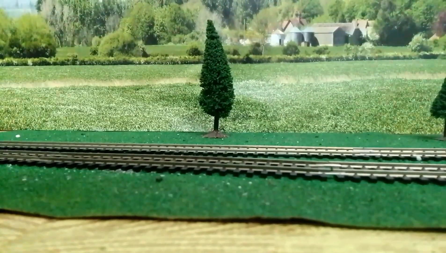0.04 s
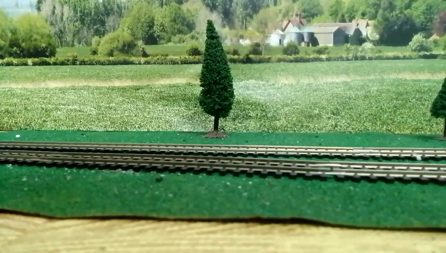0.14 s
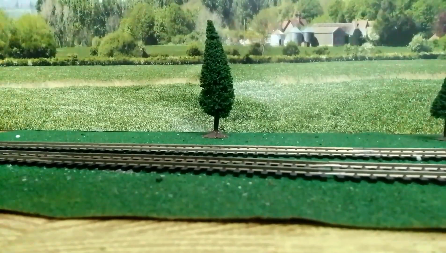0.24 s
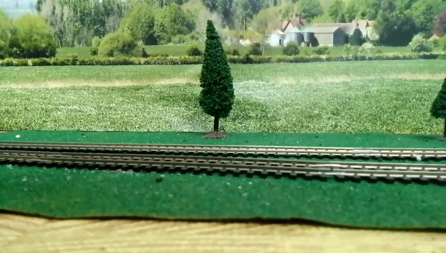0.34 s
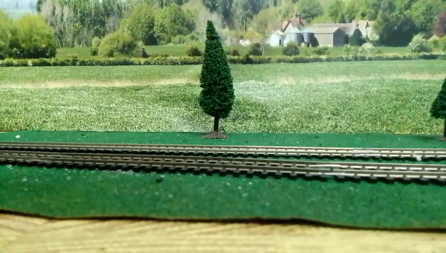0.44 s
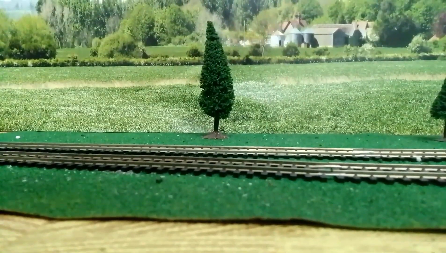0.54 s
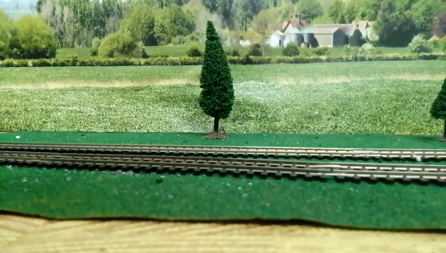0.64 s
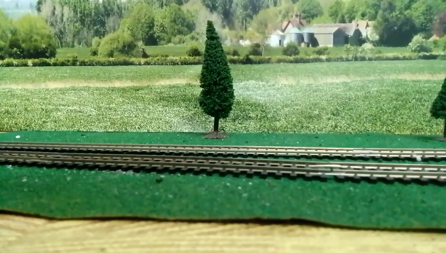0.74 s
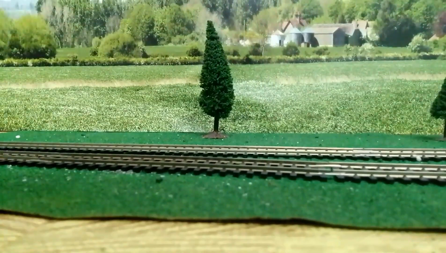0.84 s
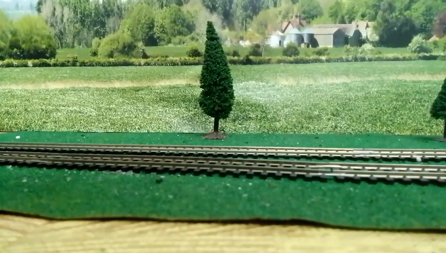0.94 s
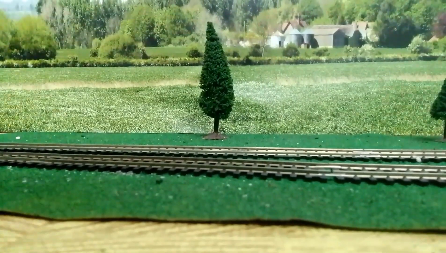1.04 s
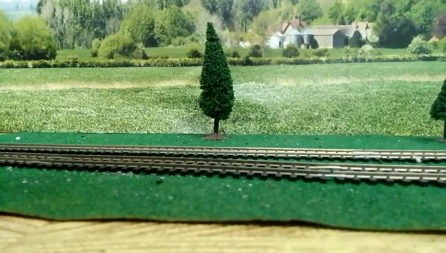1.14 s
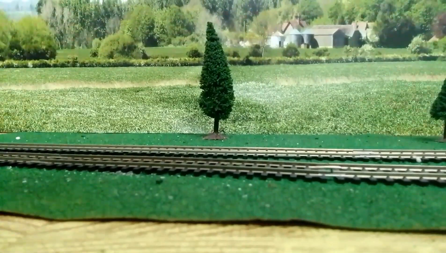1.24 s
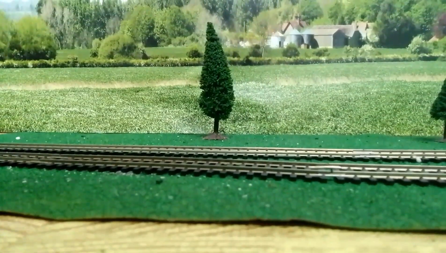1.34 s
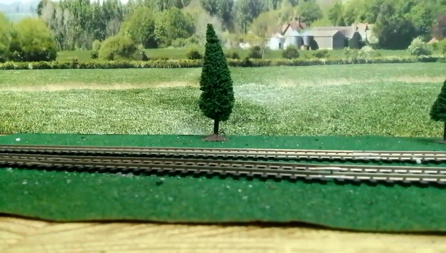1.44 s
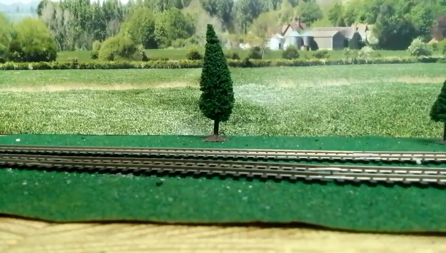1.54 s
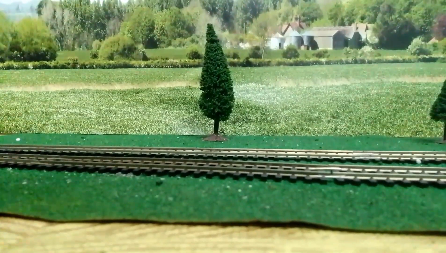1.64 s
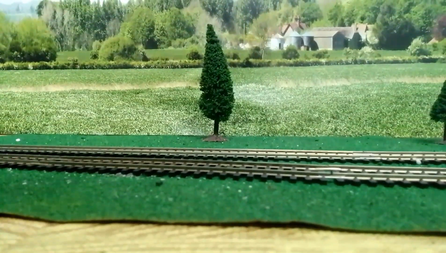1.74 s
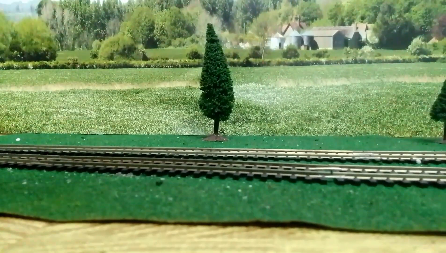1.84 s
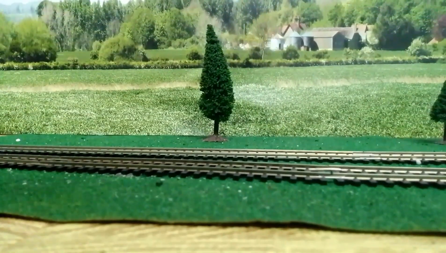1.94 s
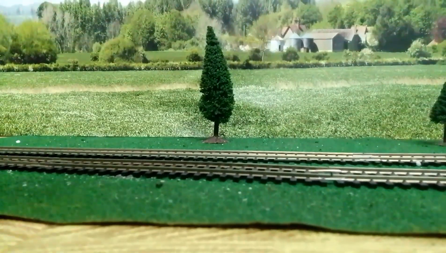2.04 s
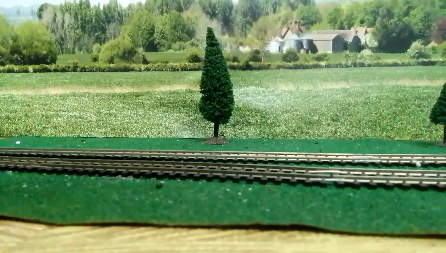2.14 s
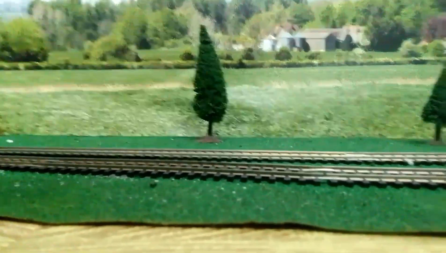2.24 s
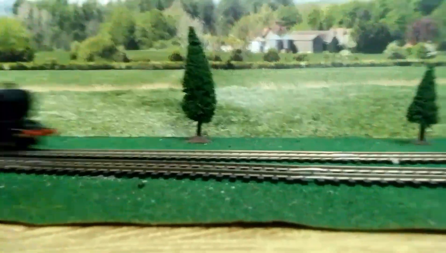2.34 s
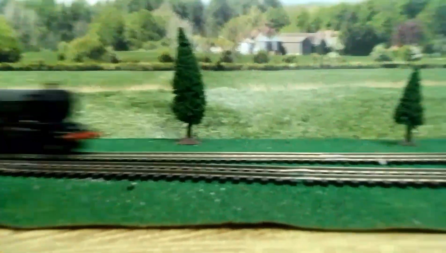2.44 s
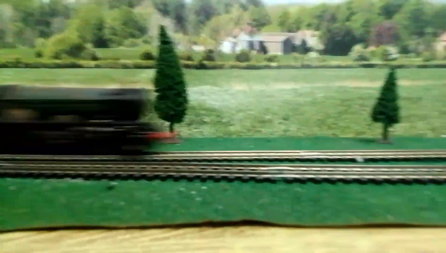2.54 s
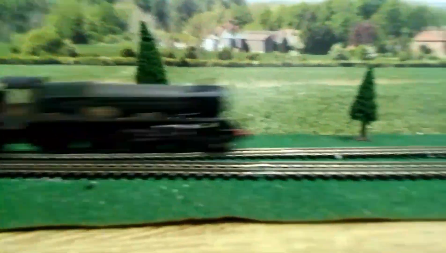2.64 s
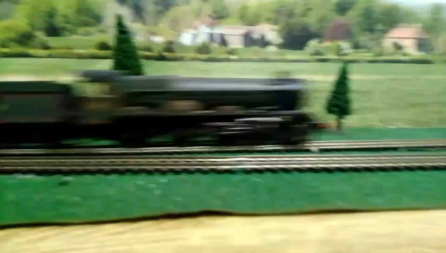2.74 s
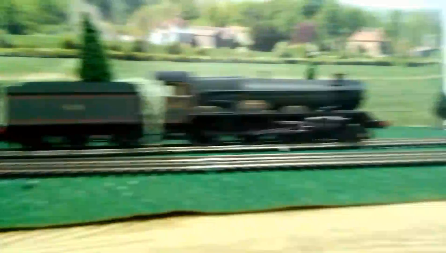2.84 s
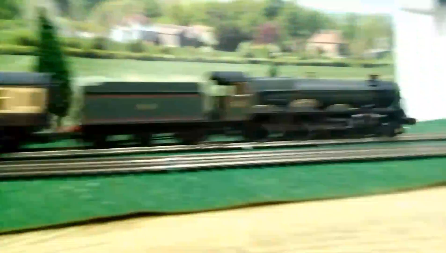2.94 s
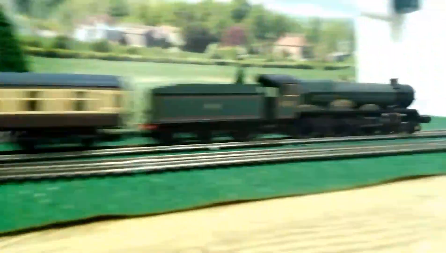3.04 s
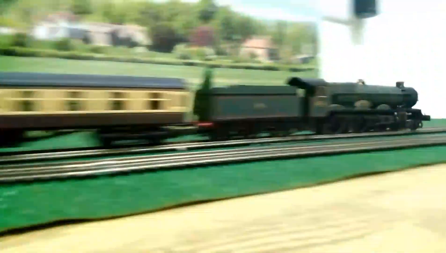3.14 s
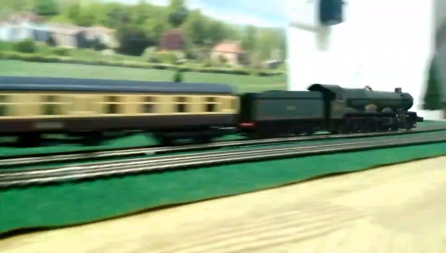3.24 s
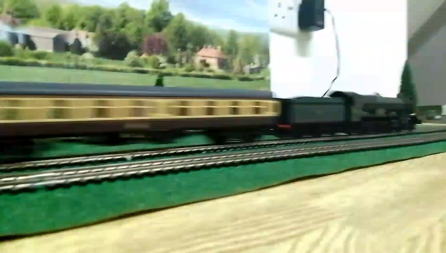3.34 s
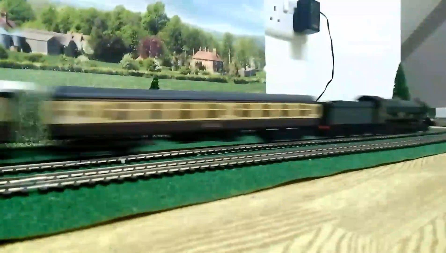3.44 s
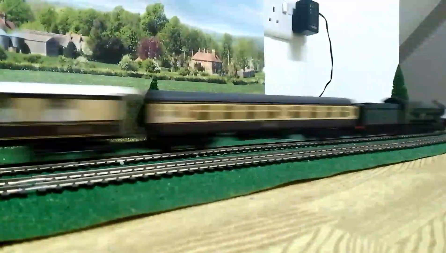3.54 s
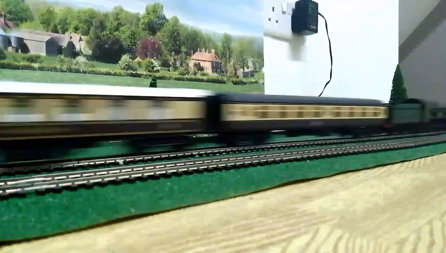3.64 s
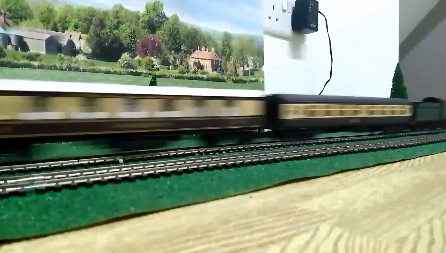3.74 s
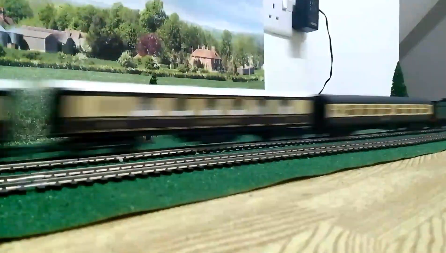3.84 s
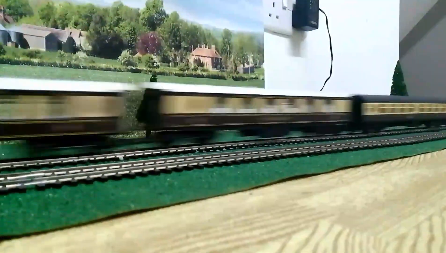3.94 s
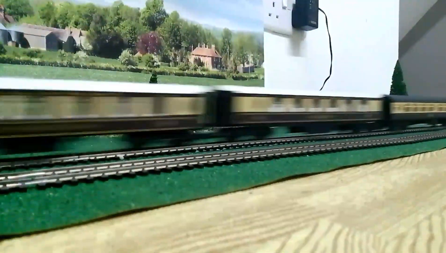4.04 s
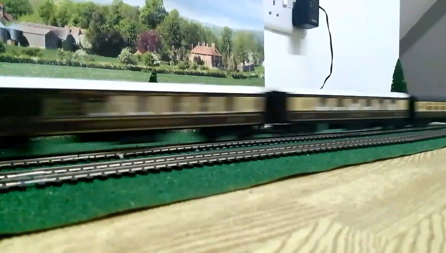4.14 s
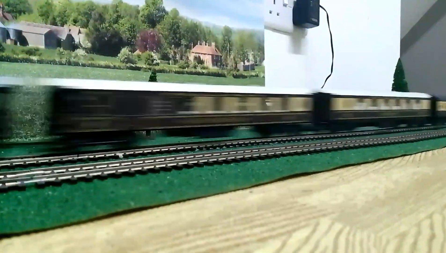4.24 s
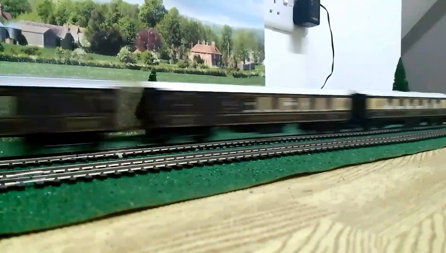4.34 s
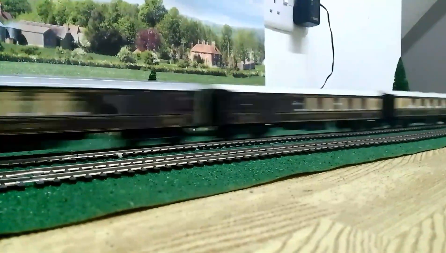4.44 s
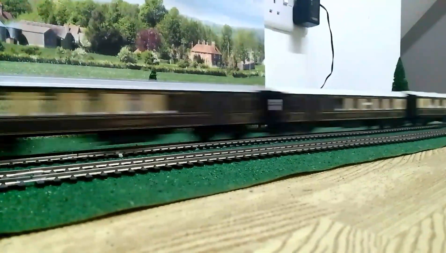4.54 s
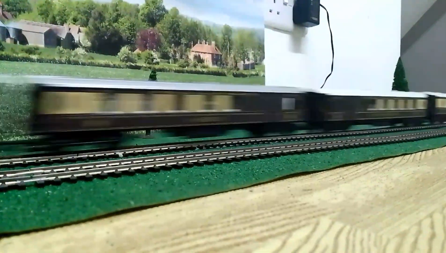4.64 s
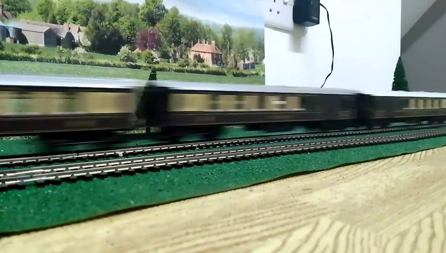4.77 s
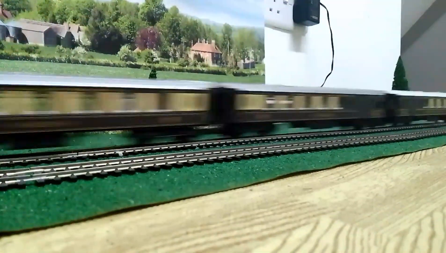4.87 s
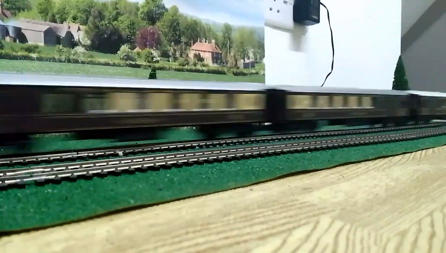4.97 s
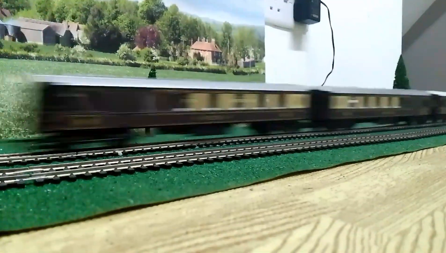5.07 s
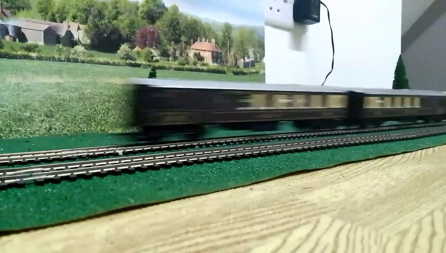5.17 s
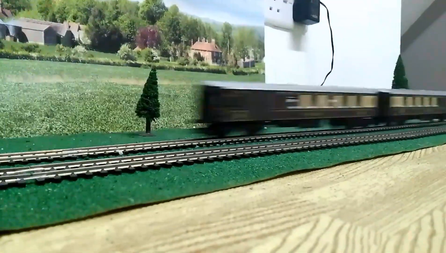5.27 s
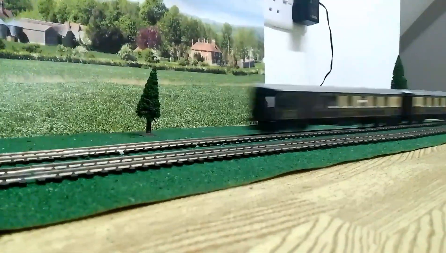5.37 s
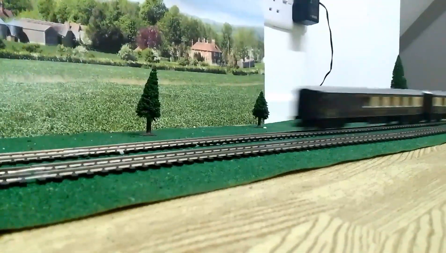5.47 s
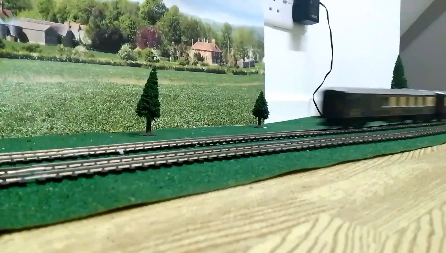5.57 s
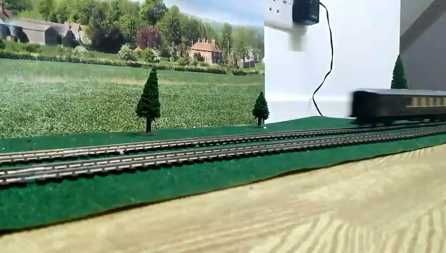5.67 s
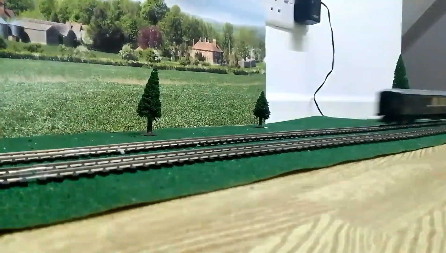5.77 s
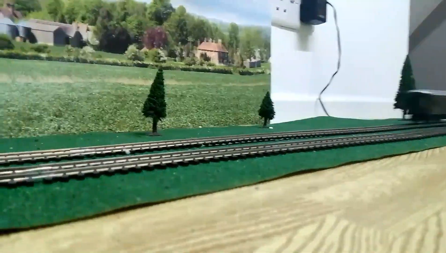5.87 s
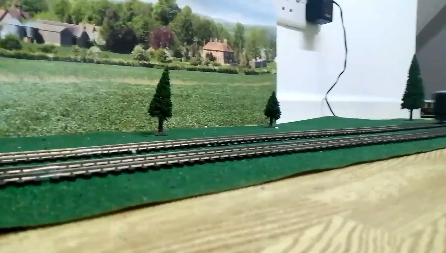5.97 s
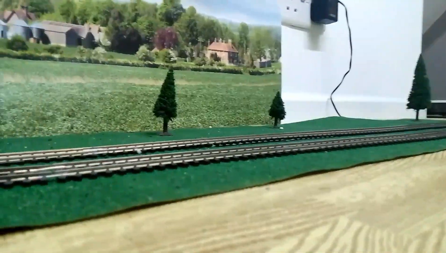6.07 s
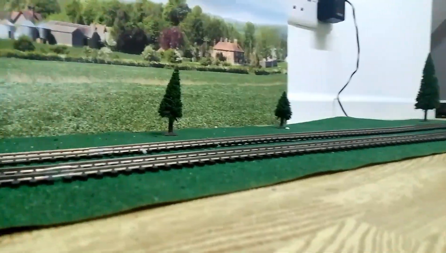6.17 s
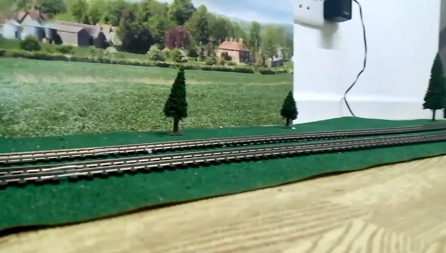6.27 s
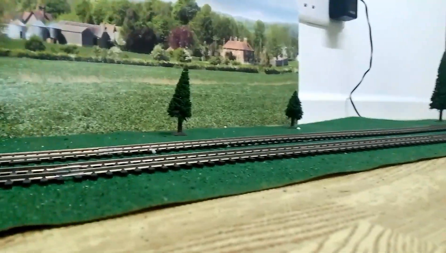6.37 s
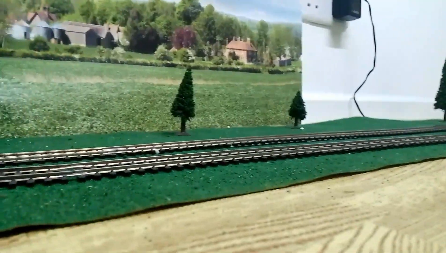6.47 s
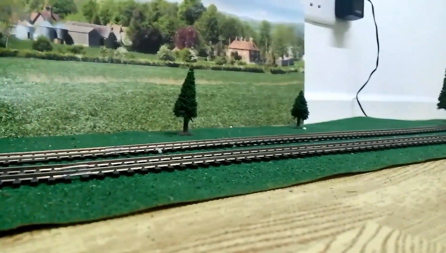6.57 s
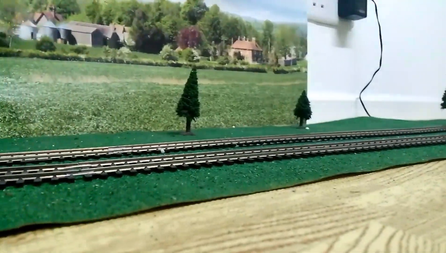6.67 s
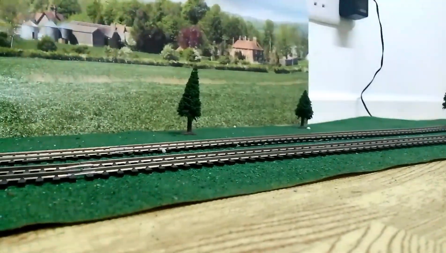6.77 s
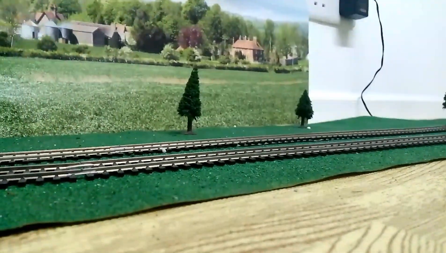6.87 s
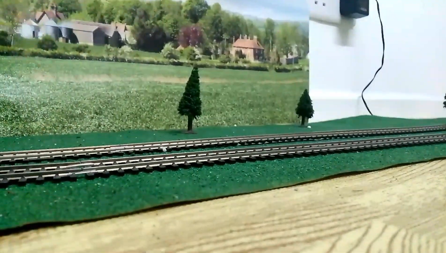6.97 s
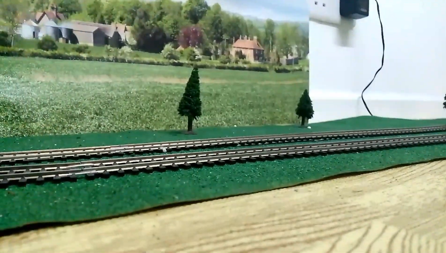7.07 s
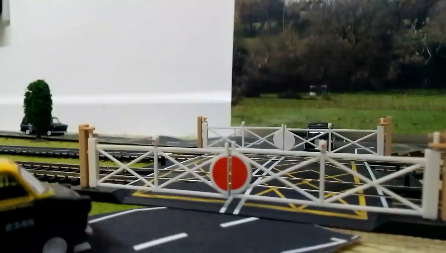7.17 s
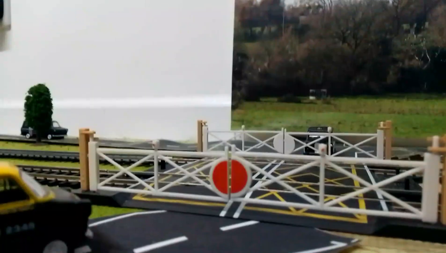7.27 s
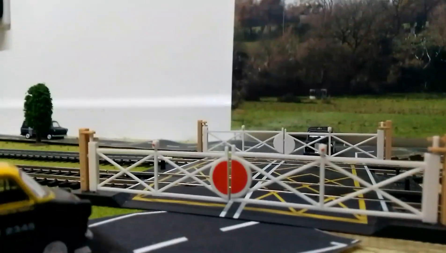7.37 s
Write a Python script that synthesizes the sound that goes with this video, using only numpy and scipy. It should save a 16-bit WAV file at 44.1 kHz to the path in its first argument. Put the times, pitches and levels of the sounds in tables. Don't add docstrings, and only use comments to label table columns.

```python
import sys
import numpy as np
from scipy import signal
from scipy.fft import rfft, irfft, next_fast_len
from scipy.io import wavfile
from scipy.ndimage import uniform_filter1d, map_coordinates

SR = 44100
rng = np.random.default_rng(int(sys.argv[2]) if len(sys.argv) > 2 else 0)


def convert_level_to_amplitude(level_db):
    exponent = np.asarray(level_db, float) / 20
    return 10 ** exponent


def persist_wave(psi):
    counts = np.round(np.clip(psi, -1, 1) * 32767).astype(np.int16)
    wavfile.write(sys.argv[1], SR, np.atleast_2d(counts).T)


N = 326820

# [t/s, rolling level/dB, wheel rim pressure on the rail/dB, baseboard level/dB]
TRAIN = [(0, -40, -12, -44), (.35, -41, -11.5, -47.5), (.55, -39, -13.5, -44.5), (1.0, -39, -13, -42.5),
         (1.5, -38.5, -10.5, -41), (1.85, -39.5, -8, -42), (2.3, -38, -8, -41), (2.55, -35, -7.5, -41),
         (3.0, -34, -5, -41.5), (3.25, -32.5, -8.5, -42.5), (3.6, -34, -9.5, -41.5),
         (3.9, -32.5, -10.5, -42.5), (4.25, -35.5, -10, -42.5), (4.72, -32.5, -15, -44),
         (4.95, -32.5, -9.5, -43.5), (5.5, -35.5, -10, -44), (6.35, -38.5, -10.5, -46.5),
         (7.13, -41, -10.5, -47)]
# [t/s, gear song level/dB]
ENGINE = [
    (2.3, -55.5),
    (2.36, -43),
    (2.48, -40),
    (2.6, -37),
    (2.68, -38),
    (2.8, -33.5),
    (3.1, -32.5),
    (3.47, -36.5),
    (3.58, -44),
]
# [t/s, peak level/dB, room answer level/dB, spark level under the peak/dB]
JOINTS = [(0.4474, -15.5, -3.5, -35), (0.948, -24.5, -6, -36), (1.04, -38, -11, -36),
          (1.1598, -36, -7, -33.5), (1.3169, -25.5, -15, -35), (1.361, -21.5, -9, -37),
          (1.5514, -29, -8.5, -32), (1.5905, -20.5, -9, -37), (2.3434, -26, -5.5, -31),
          (2.977, -24, -5, -36), (3.2994, -22.5, -3.5, -33), (3.3625, -23, -2.5, -32.5),
          (3.7434, -24.5, -5, -35), (4.0572, -26.5, -6.5, -33), (4.188, -34, -16.5, -31.5),
          (4.3262, -17, -4.5, -35), (4.364, -17.5, -21, -33), (4.4188, -22.5, -2, -32.5),
          (4.4586, -28, -10, -35), (4.656, -15, -14, -29), (4.781, -22, -7.5, -39), (4.8828, -17, -22, -34),
          (4.923, -23.5, -13, -31), (4.939, -14.5, -19, -31), (4.982, -18, -5, -39),
          (5.371, -18.5, -7.5, -33), (5.7927, -33, 0.5, -34), (5.982, -32, -4, -28), (6.648, -25, -2, -31)]
# [t/s, half length/s, squeak level/dB, bodies level/dB, roofs level/dB]
GAPS = [
    (1.55, 0.097, -2.5, 3, 1.5),
    (2.05, .45, 0.5, 3.5, 1),
    (3.15, 0.52, 3.5, 1.5, 7),
    (3.62, .16, -1, 1, -4.5),
    (3.9, 0.12, -1.5, 0.5, 2),
    (4.327, 0.23, 7, 5, 3),
    (4.797, 0.079, -8.5, 1.5, 0),
    (5.736, .25, -1.5, 0.5, -2.5),
    (7.0, 0.24, 2, -2.5, -1),
]
# [from t/s, to t/s, f/Hz, width/Hz, level/dB]
PANELS = [(.38, 1.0, 125, 33, -68.5), (.45, .86, 8580, 97, -54.5), (.45, 1.15, 4380, 61, -68),
          (.55, 1.65, 4006, 96, -57), (.72, 2.0, 236.5, 17, -61), (1.05, 2.3, 2724, 80, -54),
          (1.55, 1.92, 3030, 61, -56.5), (1.9, 2.4, 8850, 61, -59), (1.62, 2.398, 3303, 98, -57),
          (2.3, 3.0, 3520, 500, -60), (2.6, 3.3, 242, 18, -59), (2.95, 3.42, 5830, 910, -32.5),
          (3.55, 5.05, 269.6, 27, -55), (5.55, 6.1, 2840, 53, -70), (5.9, 6.548, 4080, 92, -56.5),
          (5.892, 6.8, 2070, 290, -59.5), (6.4, 7.1, 8430, 70, -58), (0, .9, 1656, 100, -56),
          (1.0, 1.75, 125.5, 35, -71), (1.75, 2.65, 3880, 200, -54.5), (1.993, 2.749, 111.6, 38, -68.5),
          (0.299, 1.7, 8070, 120, -59.5), (5.5, 6.05, 3555, 200, -56.5), (6.305, 6.95, 4650, 130, -60.5)]
BOARD = [(88, -65.5), (150, -40.5), (228, -9.5), (275, -7), (327, -6.5), (380, -5), (414, -7.5), (583, -8),
         (877, -4), (1000, 0), (1450, -2.5), (1880, -35), (3190, -120)]
# [f/Hz, level per Hz/dB]
BODIES = [(2100, -44.5), (2400, -3), (2750, -2.5), (3300, -4.5), (3900, -2.5), (4500, -3.5), (4900, -44)]
# [f/Hz, level per Hz/dB]
ROOFS = [(1200, -47.5), (1500, -6), (1750, -4), (2100, -2.5), (2300, -4), (2600, -25.5)]
# [f/Hz, level per Hz/dB]
RAILS = [(4000, -34), (4600, -9.5), (5400, -5), (5900, -3), (6400, -0.5), (6900, -3.5), (7300, -8.5),
         (7900, -37.5)]
# [f/Hz, level per Hz/dB]
SCRAPE = [(7000, -46.5), (7400, -4.5), (7650, -5.5), (8000, -8.5), (8400, -9.5), (9000, -36)]
# [f/Hz, level per Hz/dB]
SQUEAK = [(7800, -29), (8300, -2), (8800, 3), (9300, -1.5), (9700, -1), (10200, -33.5)]
# [f/Hz, level per Hz/dB]
SPARKLE = [(9500, -19.5), (10100, 0.5), (11000, -4), (12200, -4.5), (13200, -20), (14500, -14.5),
           (15500, -10), (16500, -5.5)]
# [f/Hz, width/Hz, level/dB]
RINGS = [(392, 19, -0.5), (2080, 67, 1), (3350, 90, 0), (4080, 76, 1.5), (4400, 51, 3.5), (9840, 54, 1)]
# [f/Hz, time to fall 60 dB/s]
ROOM = [(1000, 0.35), (6000, 0.45), (14000, .08)]
# [f/Hz, level/dB]
THRESHOLD = [(200, -66.5), (1400, -59.5), (3000, -59), (5000, -58.5), (8000, -60), (9900, -58.5),
             (10200, -53)]

FAR_DB = -40
SPARKLE_GROWS, ROOFS_GROW, BODIES_GROW = 1.055, 1, 1.2
SPARKLE_LEANS, ROOFS_LEAN = .5, 0.12
SHELL_HZ, SHELL_RISE_HZ_PER_S = 2082, 30
COACH_KNOCK_DB, ENGINE_KNOCK_DB = -19.5, -6
ENGINE_S = (.9, 3.5)
TOP_HZ, CUT_S = 15720, 7.1425


def unit(x):
    return x / np.sqrt(np.mean(x ** 2) + 1e-20)


def along(points, hz):
    f, v = np.transpose(points)
    return np.interp(np.log(hz + 1), np.log(f + 1), v)


def curves(rows):
    s, *cols = np.transpose(rows)
    return [np.interp(np.arange(N) / SR, s, c) for c in cols]


def wobble(rate):
    knots = rng.standard_normal(int(N * rate / SR) + 4)
    return map_coordinates(knots, [np.arange(N) * rate / SR])


def coloured(x, spectrum):
    m = next_fast_len(N + 8192)
    hz = np.fft.rfftfreq(m, 1 / SR)
    ring_db = sum(db / (1 + ((hz - c) / w) ** 2) for c, w, db in RINGS)
    return irfft(rfft(x, m) * convert_level_to_amplitude(along(spectrum, hz) + ring_db), m)[:N]


def narrow(hz, width_hz, skirt_hz):
    shake = rng.standard_normal(len(hz)) + 1j * rng.standard_normal(len(hz))
    poles = np.exp(-np.pi * np.array([width_hz, skirt_hz]) / SR)
    turn = np.exp(2j * np.pi * np.cumsum(hz) / SR)
    return unit((signal.lfilter([1], np.poly(poles), shake) * turn).real)


def rolling(spectrum, grit_db, patchy_db):
    z = signal.stft(rng.standard_normal(N), nperseg=512)[2]
    field = uniform_filter1d(rng.standard_normal(z.shape), 2, 0)
    field = uniform_filter1d(field, 24, 1)
    noise = signal.istft(z * convert_level_to_amplitude(patchy_db * unit(field)), nperseg=512)[1][:N]
    return unit(coloured(noise * convert_level_to_amplitude(grit_db), spectrum))


def rails(hiss_db, bumps, chatter):
    level_db = hiss_db + 0.87 + 0.79 * wobble(7)
    return convert_level_to_amplitude(level_db) * rolling(RAILS, 0.62 * bumps + 0.37 * chatter, patchy_db=1.5)


def rims(hiss_db, near_db, lean_db, squeak_db, bumps, chatter):
    scrape_db = hiss_db - 7.0 + lean_db + 0.8 * wobble(4.8)
    sparkle_db = -67.0 + SPARKLE_GROWS * near_db + SPARKLE_LEANS * lean_db
    scrape = convert_level_to_amplitude(scrape_db) * rolling(SCRAPE, 1.05 * bumps + 0.5 * chatter, patchy_db=1.5)
    squeak = convert_level_to_amplitude(sparkle_db + 12.0 + squeak_db) * rolling(SQUEAK, 1.3 * bumps + 0.84 * chatter, patchy_db=1.8)
    sparkle = convert_level_to_amplitude(sparkle_db + 13.5) * rolling(SPARKLE, 0.98 * bumps + 0.55 * chatter, patchy_db=3.2)
    return scrape + squeak + sparkle


def coaches(near_db, lean_db, board_db, bodies_db, roofs_db, bumps, chatter):
    roofs_db = roofs_db + 0.63 * board_db - 20.5 + ROOFS_GROW * near_db * 0.46
    roofs_db = roofs_db + ROOFS_LEAN * lean_db + 0.51 * wobble(6)
    bodies_db = -49.5 + BODIES_GROW * near_db + bodies_db
    roofs = convert_level_to_amplitude(roofs_db) * rolling(ROOFS, 1.3 * bumps + 0.2 * chatter, patchy_db=2.5)
    bodies = convert_level_to_amplitude(bodies_db) * rolling(BODIES, 0.79 * bumps + 0.61 * chatter, patchy_db=2.65)
    return roofs + bodies


def baseboard(board_db, bumps):
    return convert_level_to_amplitude(board_db + 1.74) * rolling(BOARD, 1.1 * bumps + 0.28 * wobble(14), patchy_db=1.3)


def wheels():
    hiss_db, lean_db, board_db = curves(TRAIN)
    t = np.arange(N) / SR
    near_db = hiss_db - FAR_DB
    lean_db = lean_db - lean_db.mean()
    gaps_db = np.zeros((3, N))
    for s, half, *db in GAPS:
        gaps_db += np.outer(db, np.exp(-((t - s) / half) ** 2))
    squeak_db, bodies_db, roofs_db = gaps_db
    bumps, chatter = wobble(350), wobble(40)
    out = rails(hiss_db, bumps, chatter)
    out = out + rims(hiss_db, near_db, lean_db, squeak_db, bumps, chatter)
    out = out + coaches(near_db, lean_db, board_db, bodies_db, roofs_db, bumps, chatter)
    return out + baseboard(board_db, bumps)


def panels():
    out, t = np.zeros(N + 2 * SR), np.arange(2 * SR) / SR
    for t0, t1, hz, width_hz, db in PANELS:
        on = np.clip(np.minimum(t / 0.031, (t1 - t0 - t) / 0.11), 0, 1)
        ring = narrow(hz + 0 * t, width_hz, 1.54 * width_hz)
        out[round(t0 * SR):][:len(t)] += on * convert_level_to_amplitude(db) * ring
    return out[:N]


def joints():
    out, t = np.zeros((3, N + SR)), np.arange(SR // 4) / SR
    for s, db, room_db, bright_db in JOINTS:
        knock_db = ENGINE_KNOCK_DB if ENGINE_S[0] < s < ENGINE_S[1] else COACH_KNOCK_DB
        crack = rng.choice([-1, 1], len(t))
        ping_hz = 5900 * convert_level_to_amplitude(rng.uniform(-1.5, 1))
        ping = np.sin(2 * np.pi * ping_hz * t) + 0.45 * crack
        envelope = convert_level_to_amplitude(-60 * t / 0.0077) * (1 - np.exp(-t / 0.00063))
        click = np.array([ping, crack, crack]) * envelope
        hz, frames, z = signal.stft(rng.standard_normal(len(t)), SR, nperseg=256)
        fading = z * convert_level_to_amplitude(-60 * frames / along(ROOM, hz)[:, None])
        tail = signal.istft(fading, SR, nperseg=256)[1][:len(t)]
        tail = tail * np.clip(t / 0.0039, 0, 1)
        parts_db = db + np.array([[5], [17.5 + bright_db], [17.5 + knock_db]])
        out[:, round(s * SR):][:, :len(t)] += convert_level_to_amplitude(parts_db) * (click + convert_level_to_amplitude(room_db - 9.0) * tail)
    tick, spark, knock = out[:, :N]
    tick = coloured(tick, [(2500, -30.0), (3500, -5.5), (5200, -8.5), (6400, 2.5), (7600, -4), (9500, -23.0)])
    spark = coloured(spark, [(8500, -32), (10500, 3.0), (15500, -6.5)])
    knock = coloured(knock, [(500, -31.5), (1300, -1), (2100, 1.5), (3200, -23.5)])
    return tick + spark + knock


def gears():
    song_db, = curves(ENGINE)
    t = np.arange(N) / SR
    shell_hz = SHELL_HZ + SHELL_RISE_HZ_PER_S * (t - ENGINE[0][0])
    near = np.interp(t, [2.2, 2.36, 3.5, 3.58], [0, 1, 1, 0])
    level = convert_level_to_amplitude(song_db - 0.5 + 0.99 * wobble(45))
    return near * level * narrow(shell_hz, width_hz=130, skirt_hz=700)


def noise_reducer(x, depth_db, memory_s, hold_db):
    hz, t, z = signal.stft(x, SR, nperseg=384, noverlap=256)
    keep = np.exp(-(t[1] - t[0]) / memory_s)
    power = np.abs(z) ** 2
    start = keep * power[:, :60].mean(1, keepdims=True)
    slow = signal.lfilter([1 - keep], [1, -keep], power, axis=1, zi=start)[0]
    over_db = 10 * np.log10(slow + 1e-20) - along(THRESHOLD, hz)[:, None]
    is_open = np.tanh(over_db)
    for k in range(1, len(t)):
        wish = np.tanh((over_db[:, k] + hold_db * is_open[:, k - 1]) / .9)
        is_open[:, k] = .8 * is_open[:, k - 1] + .2 * wish
    gain = convert_level_to_amplitude(-depth_db * (.5 - .5 * is_open))
    return signal.istft(z * gain, SR, nperseg=384, noverlap=256)[1][:N]


def scene():
    return (wheels() + panels() + joints() + gears())[None]


def top_cut(x):
    return signal.sosfilt(signal.butter(12, 15700, fs=SR, output="sos"), x)


def record(dry):
    x = signal.sosfilt(signal.butter(2, 150, "high", fs=SR, output="sos"), dry[0])
    x = noise_reducer(x, depth_db=9.5, memory_s=0.15, hold_db=1.2)
    self_noise = signal.lfilter([.02], [1, -.993], rng.standard_normal(N))
    x = x + convert_level_to_amplitude(-70 + 2.8 * wobble(7.8) + 2.7 * wobble(3)) * self_noise
    x = signal.sosfiltfilt(signal.cheby2(12, 50, 1.03 * TOP_HZ, fs=SR, output="sos"), x)
    x = x * (np.arange(N) < CUT_S * SR)
    return top_cut(x[None])


dry = scene()
out = record(dry)
persist_wave(out)
```